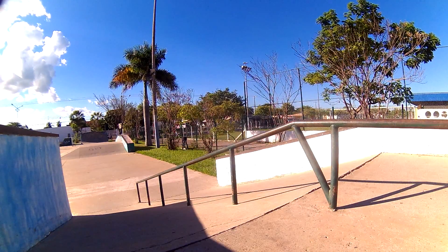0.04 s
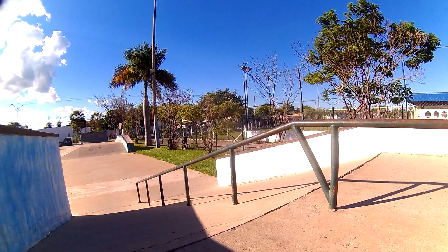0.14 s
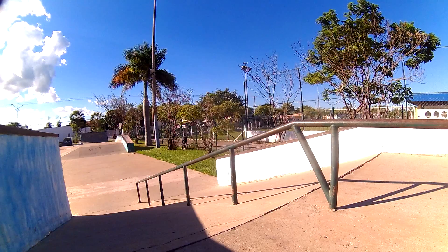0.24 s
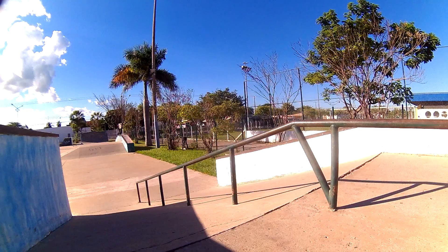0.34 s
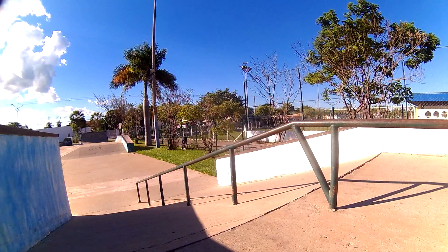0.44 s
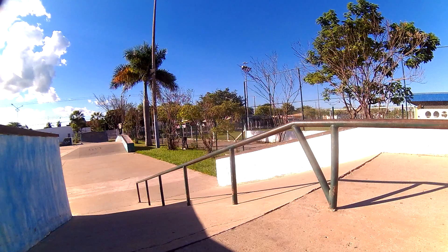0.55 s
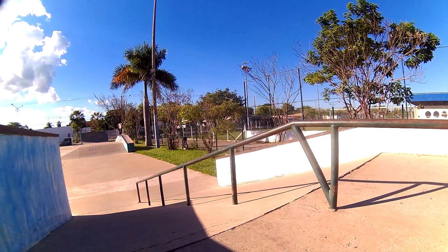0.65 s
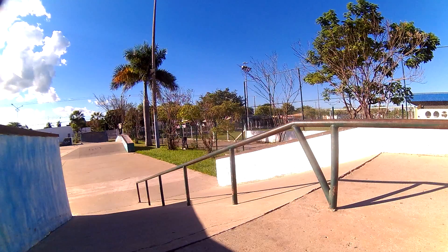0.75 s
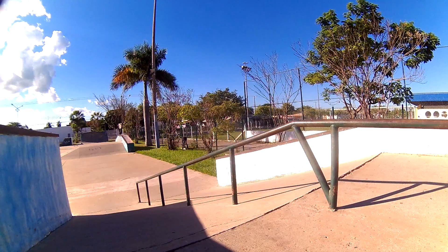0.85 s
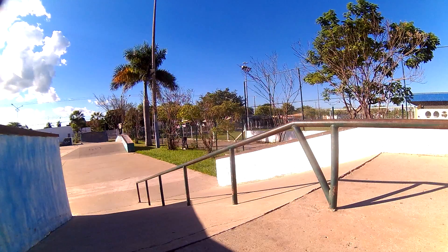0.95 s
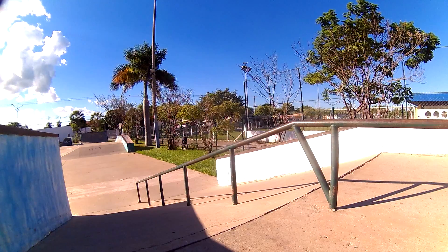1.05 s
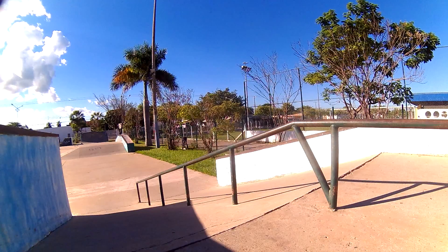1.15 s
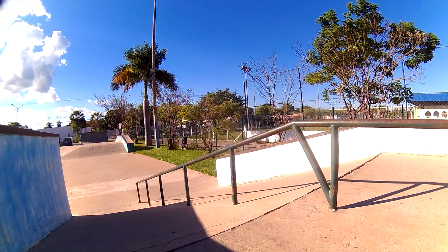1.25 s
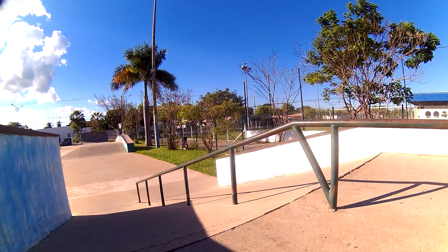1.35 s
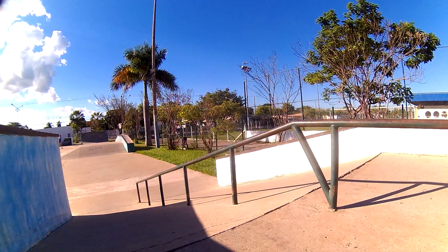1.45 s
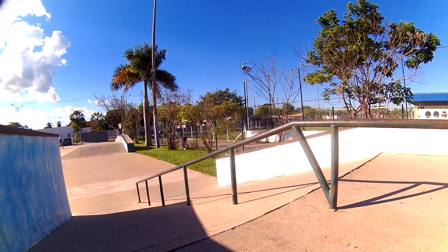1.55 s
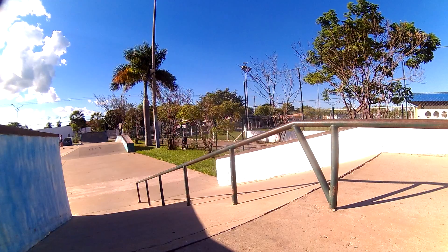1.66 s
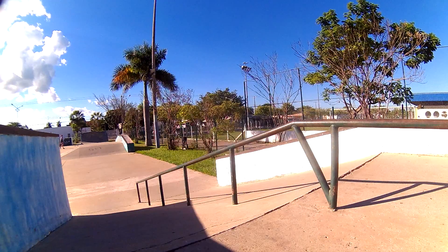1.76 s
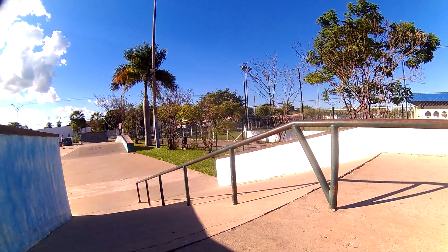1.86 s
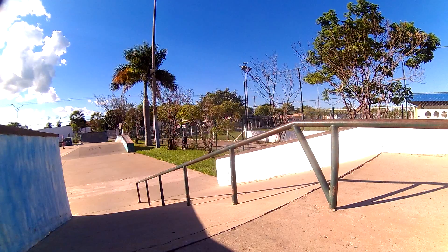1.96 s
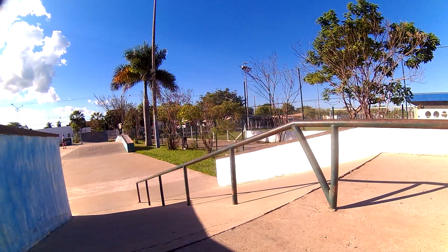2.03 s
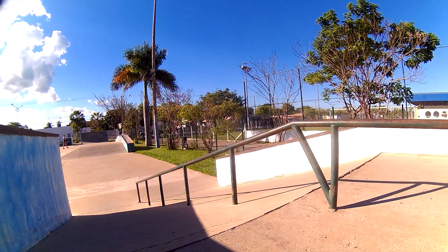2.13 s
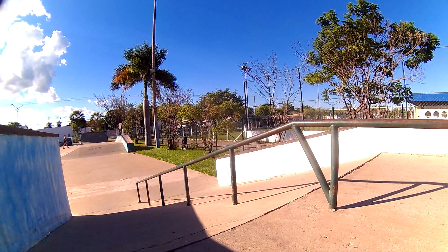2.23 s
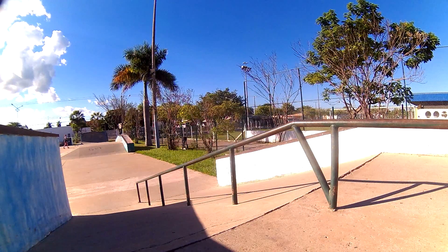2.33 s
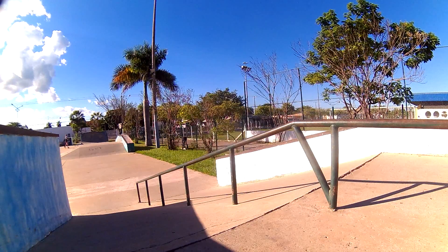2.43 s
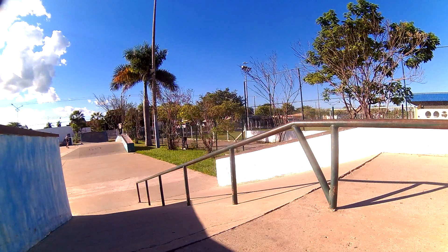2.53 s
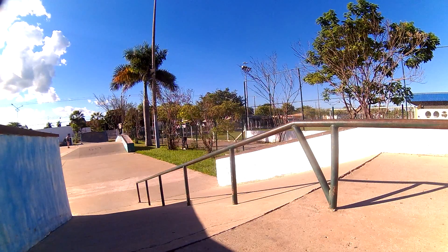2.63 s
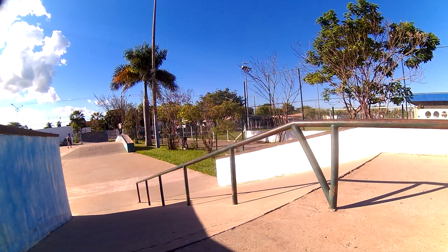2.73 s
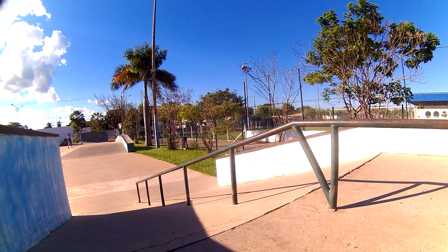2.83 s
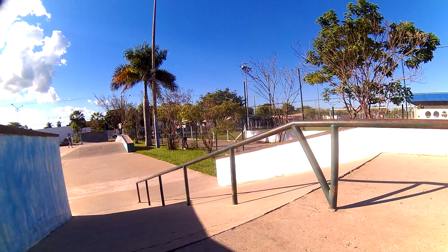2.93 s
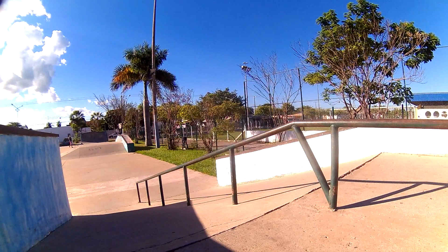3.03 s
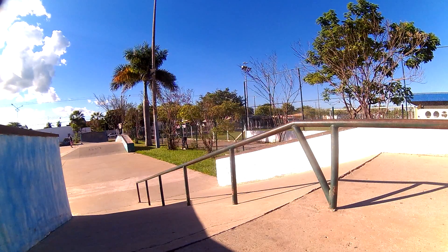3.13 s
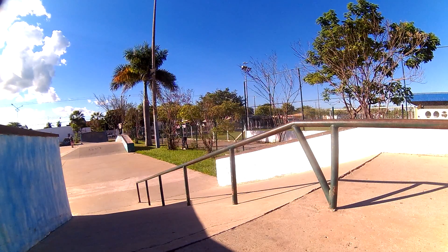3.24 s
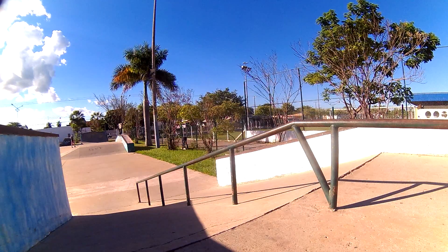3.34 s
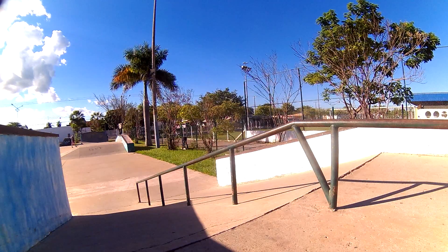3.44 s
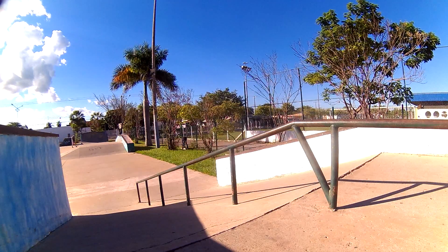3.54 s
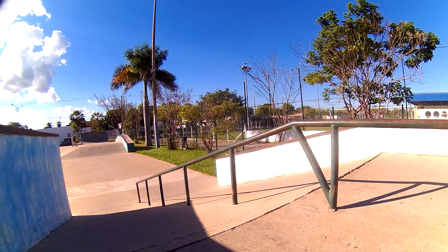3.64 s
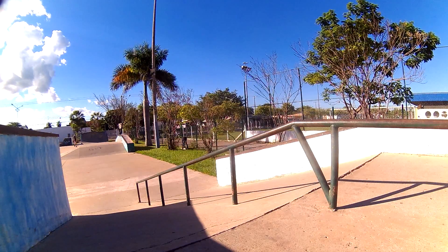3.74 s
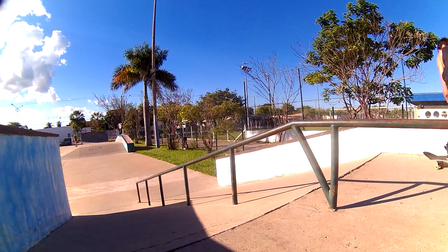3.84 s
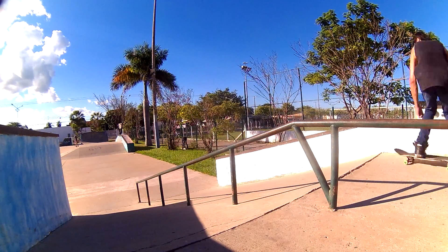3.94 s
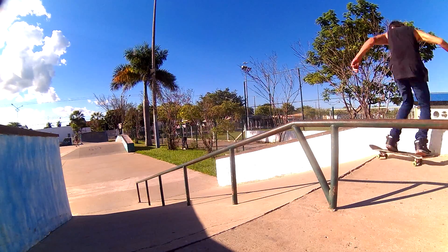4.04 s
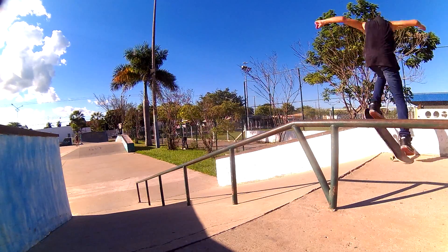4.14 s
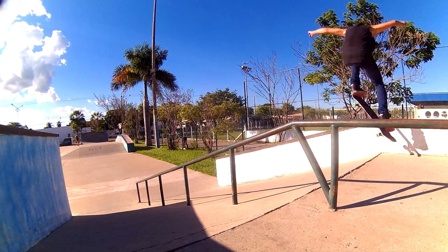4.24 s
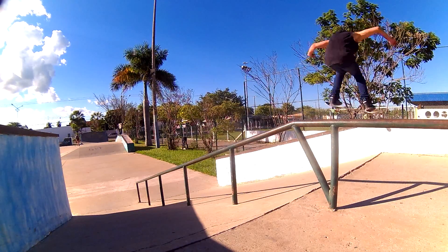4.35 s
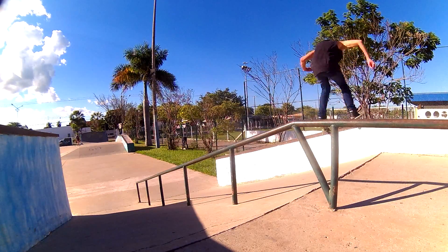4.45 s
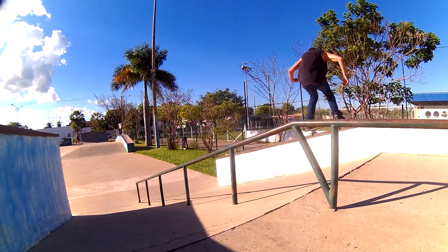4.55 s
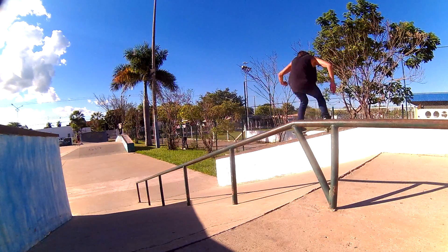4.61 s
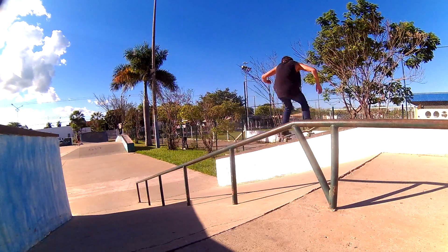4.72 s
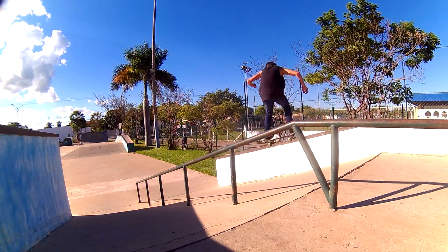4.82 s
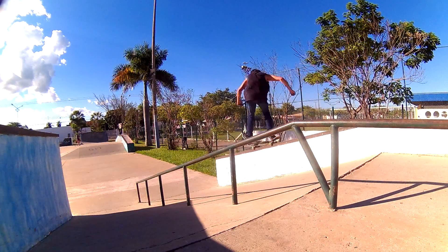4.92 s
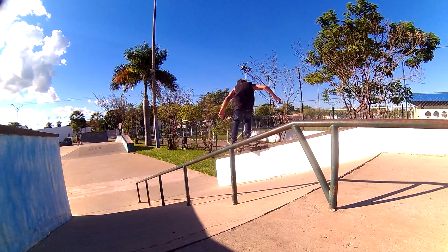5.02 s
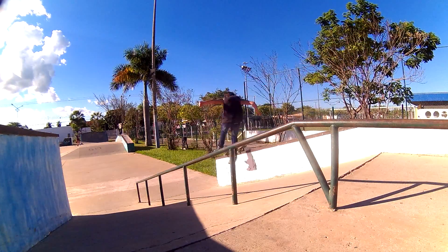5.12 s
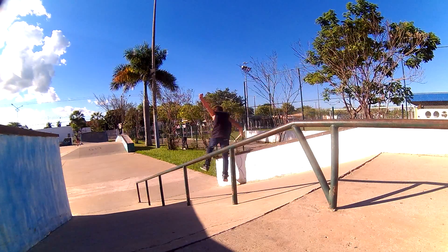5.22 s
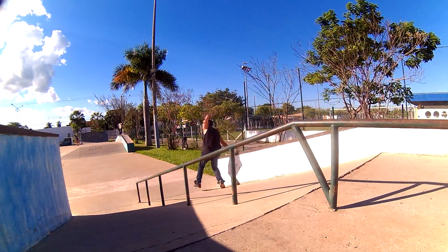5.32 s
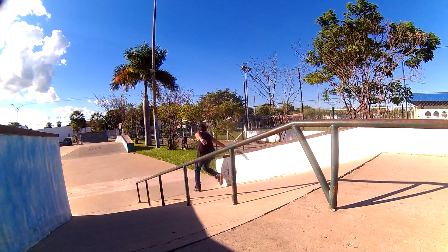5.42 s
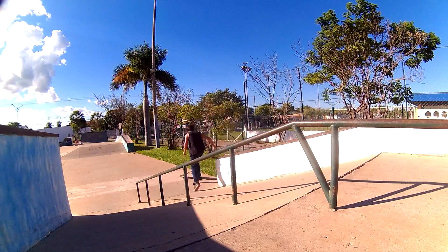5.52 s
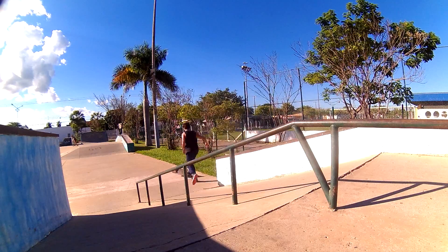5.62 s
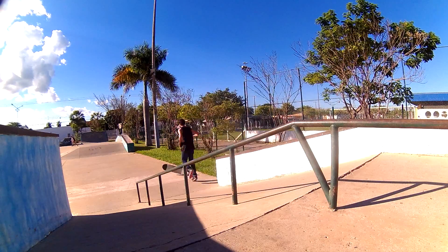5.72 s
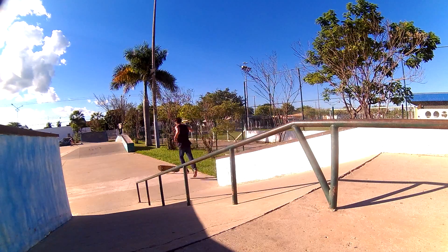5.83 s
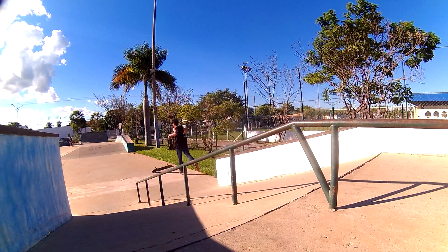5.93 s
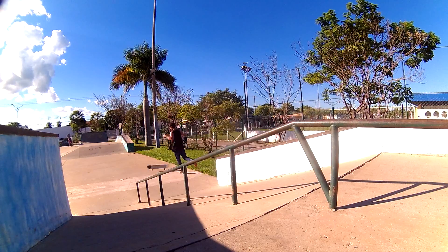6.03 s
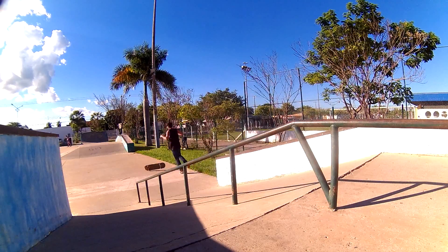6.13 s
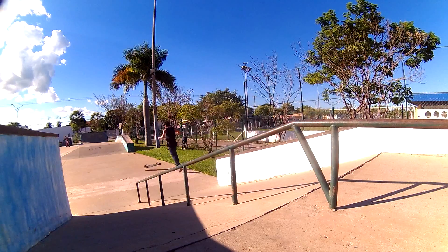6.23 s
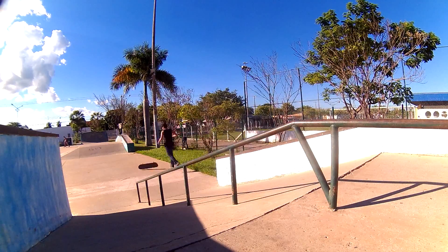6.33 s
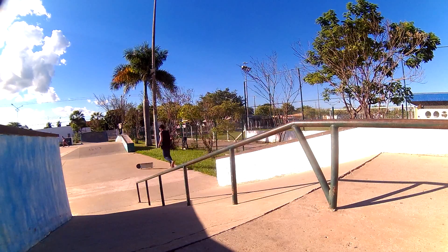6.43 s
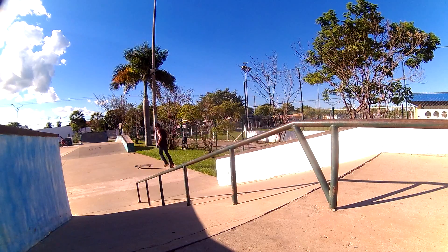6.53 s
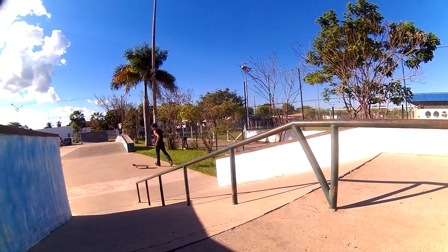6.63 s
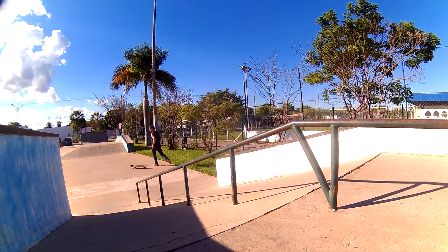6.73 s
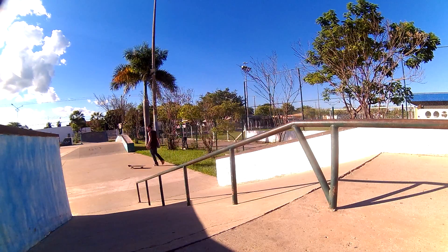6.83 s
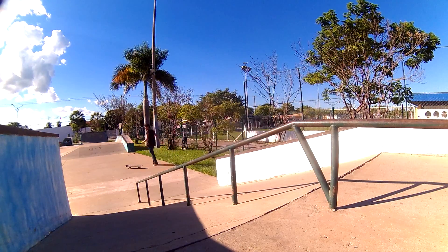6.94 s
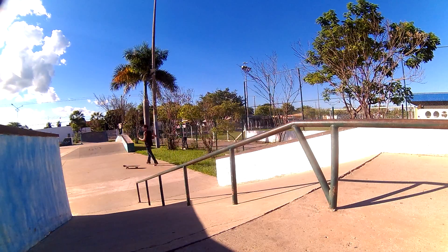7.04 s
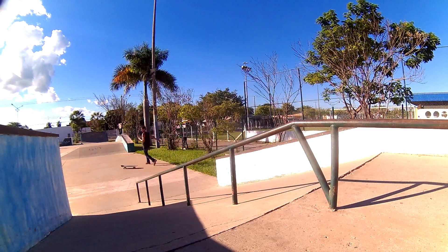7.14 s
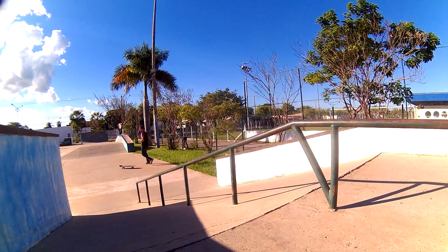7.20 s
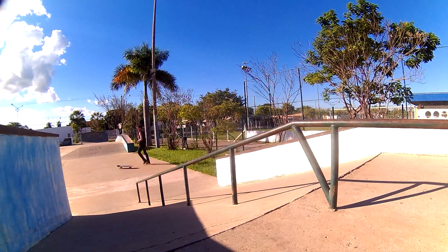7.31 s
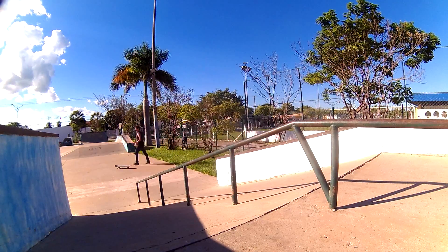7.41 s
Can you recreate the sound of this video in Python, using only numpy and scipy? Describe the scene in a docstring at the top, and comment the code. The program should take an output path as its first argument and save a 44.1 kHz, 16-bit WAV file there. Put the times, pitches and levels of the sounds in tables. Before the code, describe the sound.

After a handling knock and light wind, a skateboard slaps down, rolls roughly over concrete, pops and scrapes a steel rail, then clatters away.

```python
"""Skateboard on a handrail

After a knock from handling the camera, a skater throws his board down on concrete, rolls past, pops it onto
a steel handrail and bails; the board tumbles away.
Blows and wheel roar are noise bursts and grains shaped by resonances of deck and camera case, which boom near 680 Hz.
Light wind rumbles on the case; hard hits overload the input, clip and duck its gain for a moment."""
import sys
import numpy as np
from scipy import signal
from scipy.fft import rfft, irfft, next_fast_len
from scipy.io import wavfile
from scipy.ndimage import minimum_filter1d

SR = 44100
rng = np.random.default_rng(int(sys.argv[2]) if len(sys.argv) > 2 else 0)


def output_pcm(signal):
    """Save a mono or channel-first signal as 16-bit PCM at the path in sys.argv[1].

    Samples are clipped to [-1, 1] before scaling.
    """
    pcm = np.clip(np.atleast_2d(signal).T, -1, 1) * 32767
    wavfile.write(sys.argv[1], SR, np.round(pcm).astype(np.int16))


N = 329427
TIME = np.arange(N) / SR
# wheels down, rider on, pop, onto the rail, bail, board back on its wheels
ROLL_S, MOUNT_S, POP_S, RAIL_S, BAIL_S, RUNOUT_S = 2.11, 2.47, 4.1, 4.59, 5.28, 6.51
# contact builds up and lets go
GRIP_S, RELEASE_S = 0.045, 0.052
# slow wavering of the contact pressure
WOBBLE_DB = 1.1


def from_db(db):
    """Decibels to gain."""
    return 10 ** (np.asarray(db) / 20)


def rms_one(x):
    """Scale to unit power."""
    return x / np.sqrt(np.mean(x ** 2) + 1e-20)


def since(start_s):
    """Seconds gone by, zero before the start."""
    return np.maximum(TIME - start_s, 0)


def gate(start_s, end_s, rise_s, fall_s):
    """Envelope: straight rise from the start, hold, exponential decay after the end."""
    rise = np.clip((TIME - start_s) / max(rise_s, 1e-3), 0, 1)
    fall = np.exp(-np.clip((TIME - end_s) / max(fall_s, 1e-3), 0, 20))
    return rise * fall


def in_time(rows):
    """A dB curve joined by straight lines, and its swing about the mean of its points."""
    knot_s, knot_db = np.transpose(rows)
    curve_db = np.interp(TIME, knot_s, knot_db)
    return curve_db, curve_db - knot_db.mean()


def drift(rate_hz):
    """Slow chance with unit power: random knots joined by straight lines."""
    knots = rng.standard_normal(2000)
    return rms_one(np.interp(TIME * rate_hz, np.arange(len(knots)), knots))


def grains(spread_db, wobble_db):
    """Countless bumps of uneven size, with a slower wobble of the contact pressure."""
    size_db = spread_db * drift(220) + wobble_db * drift(28)
    return rng.standard_normal(N) * from_db(size_db)


def colour(x, spectrum):
    """Give x a smooth spectrum, interpolated over log frequency; unit power."""
    hz, db = np.transpose(spectrum)
    size = next_fast_len(N)
    bins_hz = np.maximum(np.arange(size // 2 + 1) * SR / size, 1)
    gain = from_db(np.interp(np.log(bins_hz), np.log(hz), db))
    return rms_one(irfft(rfft(x, size) * gain, size)[:N])


def resonate(x, modes):
    """Parallel resonances of alternating sign, with the skirts outside the family cut off."""
    modes = sorted(modes)
    out = 0
    for k, (hz, width_hz, db) in enumerate(modes):
        r = np.exp(-np.pi * width_hz / SR)
        poles = [1, -2 * r * np.cos(2 * np.pi * hz / SR), r * r]
        gain = (-1) ** k * from_db(db) * (1 - r * r) / 2
        out = out + gain * signal.lfilter([1, 0, -1], poles, x)
    edges_hz = [modes[0][0] * 0.38, min(modes[-1][0] * 1.63, .45 * SR)]
    return signal.sosfilt(signal.butter(2, edges_hz, "band", fs=SR, output="sos"), out)


# gusts on the case: peak_s, length_s (two standard deviations), rumble_db
GUSTS = [(0.648, .1, -29), (1.216, 0.15, -31.5), (4.285, 0.042, -25), (4.9, 0.23, -26.5), (5.69, 0.11, -21)]
# deep buffeting of the breeze, relative to BREEZE_DB: time_s, level_db
BREEZE = [(0, -42.5), (1.0, -42), (1.9, -47), (3.6, -40.5), (4.45, -43), (4.9, -39), (5.75, -36.5),
          (6.1, -41.5), (7.47, -46)]
# its spectrum: freq_hz, density_db
BREEZE_SPECTRUM = [(10, -17), (25, 4.5), (45, 9.5), (65, 6.5), (130, -42)]
# rumble of wind, thuds, slab and rail: freq_hz, density_db
RUMBLE_SPECTRUM = [(20, -41), (40, -38), (60, -1.5), (80, 3.5), (130, 0.5), (180, -7.5), (280, -14.5),
                   (450, -22.5), (900, -61.5)]
# distant town and leaves, low part: freq_hz, density_db
AIR_LOW = [(120, -13), (200, -5), (314, -4.5), (379, -12), (432, -9), (516, -10), (639, -6), (746, -8),
           (801, -11.5), (1130, -23), (1230, -23.5), (1430, -28), (2120, -19.5), (2810, -27.5), (3400, -42),
           (4420, -70), (7480, -120)]
# distant town and leaves, high part: freq_hz, density_db
AIR_HIGH = [(2000, -36), (3400, -4), (4180, 1), (5060, -9.5), (5530, -0.5), (6010, -5.5), (6940, -8.5),
            (8120, -7.5), (9440, -11), (9970, -7.5), (11300, -8.5), (14100, -15), (17500, -33)]
AIR_LOW_DB, AIR_HIGH_DB = -40.37, -61.5
WIND_START_DB, WIND_WAVER_DB, WIND_FADE_DB_PER_S = -35.5, 1.05, 0.53
BREEZE_DB = 3.5
BUFFET_DB = -9   # deep part of a gust against its rumble


def air():
    """Gusts swell out of a light, fading wind and rumble on the case, over a steady distant wash."""
    gusts = sum(from_db(db) * np.exp(-(2 * (TIME - peak_s) / length_s) ** 2 / 2)
                for peak_s, length_s, db in GUSTS)
    white = rng.standard_normal((4, N))
    wind_db = WIND_START_DB - WIND_FADE_DB_PER_S * TIME + WIND_WAVER_DB * drift(5)
    rumble = np.hypot(from_db(wind_db), gusts) * colour(white[0], RUMBLE_SPECTRUM)
    breeze_db, _ = in_time(BREEZE)
    buffet = np.hypot(from_db(breeze_db + BREEZE_DB), from_db(BUFFET_DB) * gusts)
    breeze = buffet * colour(white[1], BREEZE_SPECTRUM)
    low_wash = from_db(AIR_LOW_DB) * colour(white[2], AIR_LOW)
    high_wash = from_db(AIR_HIGH_DB) * colour(white[3], AIR_HIGH)
    return rumble + breeze + low_wash + high_wash


# camera knock, then heavy landings of board and feet: start_s, level_db
THUDS = [(0.049, -22.5), (2.458, -12.5), (4.388, -17.5), (5.55, -17), (6.06, -27), (6.39, -22.5),
         (6.673, -26)]
THUD_RISE_S, THUD_DECAY_S = 0.0056, .045


def thuds():
    """The camera knock and each heavy landing give a short, deep shudder of low noise."""
    shake = sum(from_db(db) * gate(s, s + THUD_RISE_S, THUD_RISE_S, THUD_DECAY_S) for s, db in THUDS)
    return shake * colour(rng.standard_normal(N), RUMBLE_SPECTRUM)


# roar of wheels and dragging deck: freq_hz, density_db
ROAR = [(110, -68), (180, -6.5), (408, -6), (474, 1.5), (545, -6.5), (665, 4.5), (805, -7), (926, -24),
        (1070, -17.5), (1200, -35), (1300, -40), (1690, -65), (2860, -120)]
# bright hiss of the dragging deck: freq_hz, density_db
SLIDE_HISS = [(1940, -45), (3300, -19), (3790, -3), (4200, -1), (4680, -13), (5910, -2), (6920, -4.5),
              (7890, -5.5), (9620, -27), (10100, -27), (10700, -4), (11200, -5.5), (12600, -7),
              (14800, -27), (17000, -18)]


def friction(roar_db, rasp_db, hiss_db):
    """Wood dragging over steel and concrete: uneven noise grains roar, rasp in the upper deck modes and hiss."""
    roar = from_db(roar_db) * colour(grains(spread_db=2.8, wobble_db=WOBBLE_DB), ROAR)
    rasp = from_db(rasp_db) * rms_one(resonate(grains(spread_db=3.0, wobble_db=WOBBLE_DB), CLACK))
    hiss = from_db(hiss_db) * colour(grains(spread_db=4.0, wobble_db=WOBBLE_DB), SLIDE_HISS)
    return roar + rasp + hiss


# levels at the start of the run-out; the rasp setting also sets the roar
RUNOUT_HISS_DB, RUNOUT_RASP_DB, HISS_FADE_DB_PER_S, RASP_FADE_DB_PER_S = -49.5, -59, 14.5, 50


def run_out():
    """Back on its wheels the board coasts away: roar and rasp die quickly, the bearings' hiss lasts longer."""
    rasp_db = RUNOUT_RASP_DB - RASP_FADE_DB_PER_S * since(RUNOUT_S)
    hiss_db = RUNOUT_HISS_DB - HISS_FADE_DB_PER_S * since(RUNOUT_S)
    return np.minimum(since(RUNOUT_S) / GRIP_S, 1) * friction(rasp_db, rasp_db, hiss_db)


# levels relative to each blow's strength plus half its hardness
RATTLE_T60_S, RATTLE_ROAR_DB, RATTLE_RASP_DB, RATTLE_HISS_DB = 0.37, -17, -25, -34.5


def tumble():
    """Without its rider the board skitters on after every blow, the longer the harder it was struck."""
    power = 0
    for start_s, strength_db, _, hardness_db, _, _ in BLOWS:
        if start_s > BAIL_S - RELEASE_S:
            level_db = strength_db + hardness_db / 2 - 60 * since(start_s) / RATTLE_T60_S
            power = power + from_db(2 * level_db) * (TIME > start_s)
    return np.sqrt(power) * friction(RATTLE_ROAR_DB, RATTLE_RASP_DB, RATTLE_HISS_DB)


# wheel roar as the board is loaded and comes near: time_s, level_db
ROLL = [(2.1, -46), (2.46, -36.5), (2.72, -26), (2.87, -31), (3.76, -27.5), (3.91, -20.5), (3.99, -21.5),
        (4.12, -38.5)]
# grit under the wheels: freq_hz, density_db
GRIT = [(560, -36), (950, 1.5), (1110, -13), (1250, -10), (1490, -5), (2110, -8.5), (2630, -24),
        (2880, -16.5), (3400, -44), (4420, -62), (7480, -120)]
# hiss of the spinning bearings: freq_hz, density_db
BEARINGS = [(2000, -43), (3400, -11), (4110, 7), (4420, 0), (4630, -8), (5130, -5), (6190, 3), (6990, -6.5),
            (7940, 1.5), (8910, -13), (11100, -0.5), (14500, -15), (17000, -18)]
# levels at mean roar, halfway through the roll; FOLLOWS is the share of the roar's swing
GRIT_DB, GRIT_FOLLOWS, GRIT_FADE_DB_PER_S = -46, 0.19, 3.5
BEARING_DB, BEARING_FOLLOWS, BEARING_RISE_DB_PER_S = -59.5, 0.64, 4
# level as the rider mounts
SLAB_DB, SLAB_FADE_DB_PER_S = -23.5, 5


def wheels():
    """Rough concrete roars and crackles in the rolling board, bearings hiss, the slab rumbles under the rider."""
    roar_db, swing_db = in_time(ROLL)
    approach_s = np.clip(TIME, ROLL_S, POP_S) - (ROLL_S + POP_S) / 2
    grit_db = GRIT_DB + GRIT_FOLLOWS * swing_db - GRIT_FADE_DB_PER_S * approach_s
    hiss_db = BEARING_DB + BEARING_FOLLOWS * swing_db + BEARING_RISE_DB_PER_S * approach_s
    slab_db = SLAB_DB - SLAB_FADE_DB_PER_S * since(MOUNT_S)
    roar = from_db(roar_db) * colour(grains(spread_db=0.5, wobble_db=WOBBLE_DB), ROAR)
    grit = from_db(grit_db) * colour(grains(spread_db=2.5, wobble_db=WOBBLE_DB), GRIT)
    hiss = from_db(hiss_db) * colour(grains(spread_db=1.6, wobble_db=WOBBLE_DB), BEARINGS)
    slab = from_db(slab_db) * colour(rng.standard_normal(N), RUMBLE_SPECTRUM)
    rolling = gate(ROLL_S, POP_S, GRIP_S, RELEASE_S) * (roar + grit + hiss)
    return rolling + gate(MOUNT_S, POP_S, GRIP_S, RELEASE_S) * slab


NICKS_PER_S, NICK_DB, NICK_SPREAD_DB = 45, -53, 5


def nicks():
    """Tiny flaws in the rail tick in the deck at random."""
    hits = rng.random(N) < NICKS_PER_S / SR
    size = from_db(NICK_SPREAD_DB * np.minimum(rng.exponential(1, N), 3))
    clicks = hits * size + 1e-18
    return from_db(NICK_DB) * (rms_one(resonate(clicks, CLACK)) + rms_one(resonate(clicks, CRACK)))


# roar of the deck dragging down the rail: time_s, level_db
SLIDE = [(4.6, -31.5), (4.82, -31), (4.96, -40), (5.12, -40), (5.19, -24.5), (5.32, -41)]
# rasp at mean roar and its share of the swing; hiss level halfway down the rail
RASP_DB, RASP_FOLLOWS, RAIL_RUMBLE_DB = -47, 0.5, -30.5
RAIL_HISS_DB, RAIL_HISS_RISE_DB_PER_S = -50, 6


def slide():
    """The deck gathers speed down the rail, hissing louder; the rail ticks and rumbles until the rider bails."""
    roar_db, swing_db = in_time(SLIDE)
    descent_s = np.clip(TIME, RAIL_S, BAIL_S) - (RAIL_S + BAIL_S) / 2
    hiss_db = RAIL_HISS_DB + RAIL_HISS_RISE_DB_PER_S * descent_s
    drag = friction(roar_db, RASP_DB + RASP_FOLLOWS * swing_db, hiss_db)
    rumble = from_db(RAIL_RUMBLE_DB) * colour(rng.standard_normal(N), RUMBLE_SPECTRUM)
    return gate(RAIL_S, BAIL_S, GRIP_S, fall_s=0.11) * (drag + nicks() + rumble)


# skids of grip tape and wheels on concrete: start_s, length_s, hiss_db, judder_db
SCUFFS = [(2.482, 0.026, -38, -19.5), (4.399, 0.043, -23, -10.5), (5.494, 0.087, -45, -23),
          (5.77, 0.051, -44, -18.5), (5.948, 0.02, -39.5, -30.5), (6.069, 0.056, -43, -22),
          (6.123, 0.049, -46.5, -25.5), (6.295, 0.029, -37.5, -30), (6.511, 0.095, -44, -35)]
# bright friction resonances: freq_hz, width_hz, level_db
SCUFF_MODES = [(4000, 1200, -10), (6300, 550, 3.5), (7900, 640, 2.5), (12000, 1600, -6)]


def scuffs():
    """Short skids: bright friction and a juddering deck under one rounded stroke."""
    strokes = np.array([np.sqrt(np.maximum(1 - (2 * (TIME - start_s) / length_s - 1) ** 2, 0))
                        for start_s, length_s, _, _ in SCUFFS])
    _, _, hiss_db, judder_db = np.transpose(SCUFFS)
    friction_noise = rms_one(resonate(grains(spread_db=7, wobble_db=1.5), SCUFF_MODES))
    deck_noise = rms_one(resonate(grains(spread_db=1.5, wobble_db=1.5), KNOCK))
    hiss = from_db(hiss_db) @ strokes * friction_noise
    judder = from_db(judder_db) @ strokes * deck_noise
    return hiss + judder


# blows after which the board flies free: start_s, level_db
FLIGHTS = [(4.087, -40), (4.499, -39), (5.287, -38), (5.572, -33), (5.768, -44), (5.906, -46), (6.109, -33)]
# ringing of the free deck and its trucks: freq_hz, level_db, t60_s
FREE_MODES = [(728, -3, .13), (1453, -20, .2), (2122, -8, .33), (2510, -9, .22), (2627, -14, .35),
              (4016, -17, .14), (6008, -25, .2), (8043, -30, .2)]


def free_ring():
    """Off the ground nothing damps the board: clean modes die slowly."""
    kicks = np.full(N, 1e-18)
    for start_s, db in FLIGHTS:
        kicks[int(start_s * SR)] = from_db(db)
    out = 0
    for hz, db, t60_s in FREE_MODES:
        r = from_db(-60 / (t60_s * SR))
        w = 2 * np.pi * hz / SR
        out = out + signal.lfilter([0, from_db(db) * np.sin(w)], [1, -2 * r * np.cos(w), r * r], kicks)
    return out


# deck and case resonances of the knock: freq_hz, width_hz, level_db
KNOCK = [(462, 79, -17), (673, 41.6, 5), (742, 34.4, 0), (900, 58, -13)]


def knock_modes(force, deck_hz):
    """The deck rings at a pitch set by how it is held and drives the case, so a knock swells before it dies."""
    deck = resonate(force, [(deck_hz, 450, 0)])
    return resonate(deck, [(deck_hz, 150, 0), *KNOCK])


def family(modes):
    """A body whose resonances stay the same for every blow."""
    return lambda force, deck_hz: resonate(force, modes)


# a knock from handling the camera, then blows of deck, trucks and wheels:
# start_s, strength_db, weight_db, hardness_db, deck_pitch_hz,
# chatter_decay_s (before each family's linger factor); all dB relative to the family levels
BLOWS = [ (.0508, -7.5, -10, -11, 500, .0012), (1.975, -26.5, -4.5, 5.5, 780, .007),
         (2.059, -24, -7, 4, 567, 0.0052), (2.1024, -26, 0.5, -2, 610, 0.0079),
         (2.1919, -33, -2, 3.5, 640, 0.0043), (2.2518, -27, -1, -0.5, 600, 0.0077),
         (2.2827, -24, -26, -7, 600, 0.0073), (2.3256, -36, -1, 3, 686, .006),
         (2.3563, -38.5, -6, 3, 630, .004), (2.4605, -23, 6, 8, 396, 0.0055),
         (2.4732, -17, -1.5, 0, 474, 0.0076), (2.4995, 2.5, -15, -9, 670, .002),
         (4.0864, -6, -7.5, 0, 718, 0.0086), (4.3931, -7, -1.5, 1.5, 814, 0.0026),
         (4.398, -2.5, -2.5, 7, 672, 0.0029), (4.423, -12, -0.5, 7.5, 590, .006),
         (4.435, -15, -3, 4.5, 630, 0.0047), (4.4963, -14, -13, 0.5, 638, 0.0074),
         (4.8843, -26.5, -3.5, 6, 640, 0.0072), (4.9252, -34, -7, 7, 537, 0.016),
         (5.0339, -35, -15, 7.5, 468, 0.012), (5.156, -17, -12, -5.5, 638, 0.007),
         (5.193, -17, -18, 1.5, 416, 0.0049), (5.2125, -12, -21, -2.5, 668, 0.003),
         (5.2284, -19, -10, 0.5, 615, .014), (5.2863, -6, -8, 6.5, 463, 0.0029),
         (5.304, -15.5, -17, -18, 385, 0.0057), (5.4855, -25.5, 5.5, 11, 810, 0.013),
         (5.497, -15, -4, 1.5, 672, 0.034), (5.5574, -0.5, -5.5, -1.5, 720, 0.0047),
         (5.5711, -7, -6, 3.5, 570, .0022), (5.7671, -17, -3.5, 2.5, 727, 0.0069),
         (5.8654, -15.5, -10, -1.5, 677, 0.0031), (5.905, -18.5, -9, 2.5, 643, 0.005),
         (6.052, -17, -0.5, 3.5, 638, 0.0056), (6.0931, -26.5, 10, 9, 815, 0.0091),
         (6.108, -7.5, -2, -5.5, 835, 0.002), (6.271, -15.5, -4.5, 1.5, 464, 0.0084),
         (6.3611, -15.5, 10.5, 6.5, 954, 0.0077), (6.3853, -15.5, 0, -4.5, 830, 0.011),
         (6.526, -22.5, -3.5, 7, 626, 0.0032), (6.562, -30.5, 3, 10.5, 470, .0035),
         (6.7059, -28.5, -8, 2.5, 739, 0.0067), (6.8236, -45, -10, 10.5, 668, .004),
         (6.9117, -48, -8, 15.5, 680, 0.0043), (7.0422, -44.5, 12, 17.5, 430, 0.0074)]


def blows(body, levels_db, family_db, chatter, linger, uneven_db):
    """Each blow is a sharp push and a dying chatter of tiny, uneven contacts, sent through body(force, deck_hz)."""
    t = TIME[:SR // 7]
    out = np.zeros(N + len(t))
    draws = rng.standard_normal((len(BLOWS), 2, len(t)))
    for (start_s, *_, deck_hz, decay_s), db, (grit, size) in zip(BLOWS, levels_db, draws):
        decay = np.exp(-t / max(decay_s * linger, 1e-4)) + 1e-9
        force = grit * from_db(uneven_db * size) * decay
        force *= chatter / np.linalg.norm(force)
        force[0] += 1
        ring = body(force, deck_hz)
        ring /= np.sqrt(np.sum(ring ** 2) / (SR // 100))   # energy of unit power over 10 ms
        start = int(start_s * SR)
        out[start:start + len(t)] += from_db(db + family_db) * ring
    return out[:N]


# low resonances of board and case: freq_hz, width_hz, level_db
THUMP = [(179.3, 40, -4), (274, 44.7, 6), (424, 198, -2)]
# upper deck modes: freq_hz, width_hz, level_db
CLACK = [(1270, 430, -0.5), (1760, 204, 5.5), (2062, 198, 9), (2405, 245, 5.5), (2564, 324, 1.5),
         (2890, 490, -9)]
# bright resonances: freq_hz, width_hz, level_db
CRACK = [(3760, 123, 0), (4110, 230, -2), (4120, 54, 5), (4310, 230, -7), (5000, 230, -4), (5920, 137, 4),
         (6200, 320, -0.5), (6570, 800, -5), (6900, 71, -2), (7650, 600, -7.5)]
# highest resonances: freq_hz, width_hz, level_db
TICK = [(8600, 1500, -9.5), (11100, 560, 6.5), (12800, 850, 2.5), (15300, 4400, -10)]
# ring of the steel trucks, favouring hard blows: freq_hz, width_hz, level_db
TRUCK = [(2540, 72, 0), (2767, 174, -1.5), (3030, 220, -8.5), (3735, 160, -7), (4230, 100, -6.5)]
# gain in dB per dB of a blow's edge (strength plus hardness)
CRACK_FOLLOWS, TICK_FOLLOWS, TRUCK_FOLLOWS = 0.93, 0.66, 1.34
# until it comes round the camera the board is heard from behind, its blows with less treble
IN_VIEW_S, SHADE_DB = 3.9, -10.5
# crack and truck ring fade for one second after the bail
RECEDE_DB_PER_S = 8
# the rider's feet settle on the deck and choke its knock
CHOKE_S, CHOKE_HOLD_S, CHOKE_DB = 2.508, .06, -15


def board():
    """Camera knock and board blows: strength sets the knock, weight the thump, hardness the brighter families."""
    start_s, knock_db, weight_db, hardness_db, _, _ = np.transpose(BLOWS)
    edge_db = knock_db + hardness_db
    shade_db = SHADE_DB * (start_s < IN_VIEW_S)
    far_db = shade_db - RECEDE_DB_PER_S * np.clip(start_s - BAIL_S, 0, 1)
    knock = blows(knock_modes, knock_db, family_db=1.5, chatter=.45, linger=1.0, uneven_db=2)
    thump = blows(family(THUMP), knock_db + weight_db,
                  family_db=1.0, chatter=0.98, linger=1.6, uneven_db=5.5)
    clack = blows(family(CLACK), edge_db, family_db=-11.5, chatter=2.3, linger=1.7, uneven_db=4.5)
    crack = blows(family(CRACK), CRACK_FOLLOWS * edge_db + far_db,
                  family_db=-19, chatter=2.4, linger=1.7, uneven_db=5.0)
    truck = blows(family(TRUCK), TRUCK_FOLLOWS * edge_db + far_db,
                  family_db=-13, chatter=1.0, linger=1.1, uneven_db=3)
    tick = blows(family(TICK), TICK_FOLLOWS * edge_db + shade_db,
                 family_db=-32, chatter=5, linger=1.6, uneven_db=7.5)
    choke = from_db(CHOKE_DB * gate(CHOKE_S, CHOKE_S + CHOKE_HOLD_S, rise_s=.004, fall_s=.01))
    return thump + choke * knock + clack + crack + truck + tick


# nearby walls and ramps, before the dulling filter: delay_s, level_db
WALLS = [(.0185, -19.5), (.031, -20)]


def park(x, scatter_db, t60_s, dull_hz):
    """A couple of wall echoes and a thin scatter from the ramps, all dulled by a low-pass."""
    t = TIME[:SR // 2]
    response = rng.standard_normal(len(t)) * from_db(-60 * t / t60_s) * np.minimum(t / 0.0064, 1)
    response *= from_db(scatter_db) / np.linalg.norm(response)
    for delay_s, db in WALLS:
        response[int(delay_s * SR)] += from_db(db)
    dull = signal.butter(1, min(dull_hz, .45 * SR), fs=SR, output="sos")
    return x + signal.fftconvolve(x, signal.sosfilt(dull, response))[:N]


def scene():
    """Blows, board and wheels in the open park, with deep thuds and the air around."""
    skateboard = run_out() + tumble() + wheels() + slide() + scuffs() + free_ring() + board()
    echoing = park(skateboard, scatter_db=-16.5, t60_s=0.37, dull_hz=6000)
    return (air() + thuds() + echoing)[None]


def duck(x, threshold_db, depth_db, hold_s, glide_s):
    """Gain control: a loud peak pulls the gain down, holds it there, then lets go."""
    over_db = np.clip(20 * np.log10(np.abs(x) + 1e-9) - threshold_db, 0, depth_db)
    size = int(hold_s * SR) | 1
    held_db = -minimum_filter1d(-over_db, size, origin=size // 2, mode="constant")
    r = np.exp(-1 / (glide_s * SR))
    return x * from_db(-signal.lfilter([1 - r], [1, -r], held_db))


CUTOFF_HZ = 17700


def record(dry):
    """The gain ducks too late to stop the peaks from clipping; a steep low-pass cuts the top."""
    ducked = duck(dry, threshold_db=-5.5, depth_db=6.0, hold_s=0.142, glide_s=0.006)
    clipped = np.clip(ducked, -1, 1)
    return signal.sosfilt(signal.ellip(10, .1, 70, CUTOFF_HZ, fs=SR, output="sos"), clipped)


dry = scene()
out = record(dry)
output_pcm(out)
```